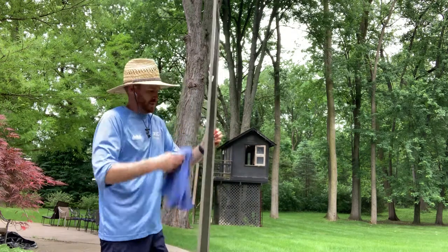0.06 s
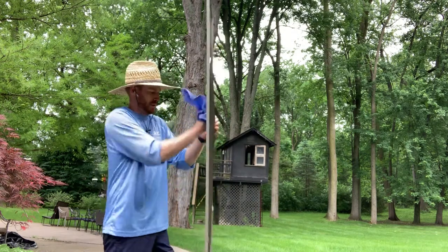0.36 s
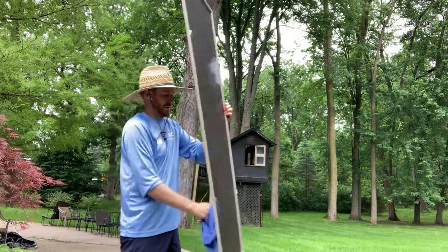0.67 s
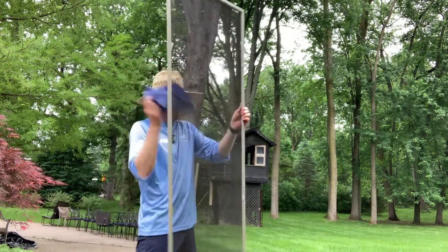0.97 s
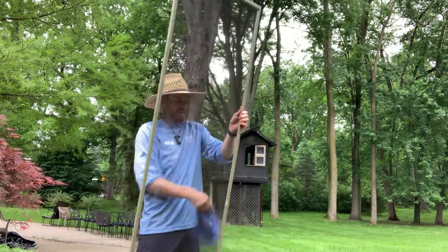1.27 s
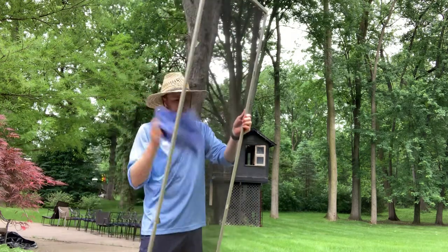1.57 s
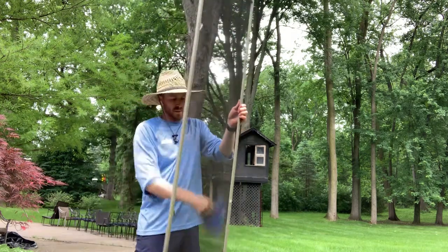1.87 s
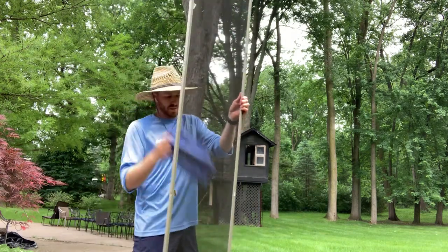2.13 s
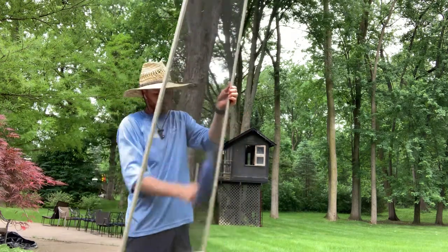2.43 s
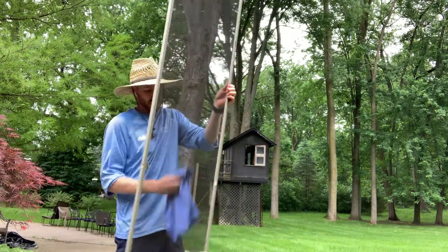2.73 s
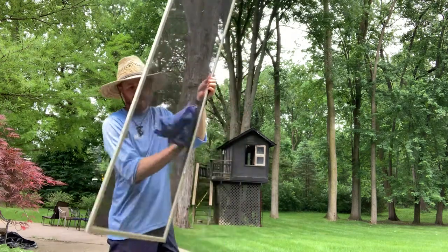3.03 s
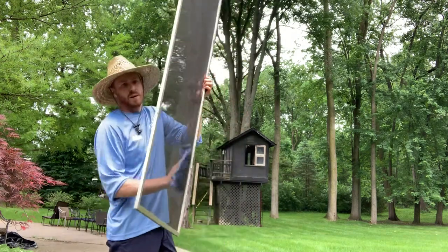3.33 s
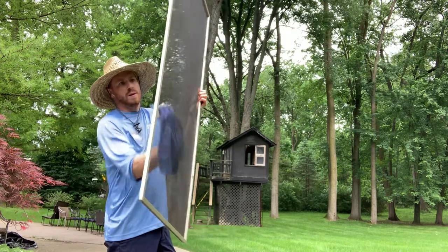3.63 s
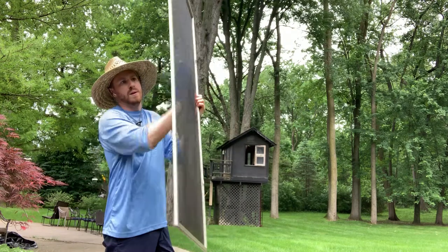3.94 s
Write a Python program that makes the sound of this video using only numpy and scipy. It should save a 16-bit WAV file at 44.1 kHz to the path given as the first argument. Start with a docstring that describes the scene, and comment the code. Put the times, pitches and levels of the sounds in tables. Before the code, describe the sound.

A cloth slaps a window screen three times close by, with soft wipes on the mesh before and after. Behind it in a wooded yard are faint bird whistles, insects and a distant engine hum.

```python
"""Dusting a window screen in a wooded yard

A cloth zips over the mesh, then slaps it three times, ringing the frame; after each slap its
tail flops down dully. Soft wipes follow, fibres rubbing on the threads. Behind, a distant
engine drones and slows, insects sizzle and bird whistles echo among the trees."""
import sys
import numpy as np
from scipy import signal
from scipy.fft import rfft, irfft
from scipy.io import wavfile

SR = 44100
rng = np.random.default_rng(int(sys.argv[2]) if len(sys.argv) > 2 else 0)


def bounce(signal):
    """Save signal as a 16-bit WAV file at the path given by the first command-line argument."""
    frames = np.transpose(np.atleast_2d(signal))
    limited = np.clip(frames, -1, 1)
    pcm = np.round(limited * 32767).astype(np.int16)
    wavfile.write(sys.argv[1], SR, pcm)


N = 176400
TIME = np.arange(N) / SR


def from_db(db):
    """Decibels to gain."""
    return 10 ** (np.asarray(db) / 20)


def unit_rms(x):
    """Scale to rms 1."""
    return x / np.sqrt(np.mean(x ** 2) + 1e-20)


def curves(rows):
    """Interpolate rows of (t/s, values...) to one curve per value column."""
    times, *columns = np.transpose(rows)
    return [np.interp(TIME, times, column) for column in columns]


def colour(x, spectrum):
    """Filter by rows of (f/Hz, level/dB), 24 dB/octave skirts; rms 1."""
    hz, db = np.transpose(spectrum)
    f = np.maximum(np.arange(N // 2 + 1) * SR / N, 1)
    octaves_outside = np.abs(np.log2(f / np.clip(f, hz[0], hz[-1])))
    gain = from_db(np.interp(np.log(f), np.log(hz), db) - 24 * octaves_outside)
    return unit_rms(irfft(rfft(x) * gain, N))


def noise(spectrum):
    """Coloured Gaussian noise; rms 1."""
    return colour(rng.standard_normal(N), spectrum)


def grains(per_s):
    """Tiny random contacts of uneven size; rms 1."""
    return unit_rms((rng.random(N) < per_s / SR) * rng.standard_normal(N))


def drift(corner_hz):
    """Low-passed random wander; rms 1."""
    f = np.arange(N // 2 + 1) * SR / N
    return unit_rms(irfft(rfft(rng.standard_normal(N)) / (1 + (f / corner_hz) ** 2), N))


def burst(start_s, attack_s, hold_s, t60_s):
    """Envelope: linear attack, hold, exponential release."""
    age_s = TIME - start_s
    release_s = np.maximum(age_s - attack_s - hold_s, 0)
    return np.clip(age_s / attack_s, 0, 1) * np.exp(-np.log(1000) * release_s / t60_s)


def ring(force, hz, t60_s):
    """One damped mode; a unit click rings it at height 1."""
    radius = np.exp(-np.log(1000) / (t60_s * SR))
    angle = 2 * np.pi * hz / SR
    return signal.lfilter([0, np.sin(angle)], [1, -2 * radius * np.cos(angle), radius ** 2],
                          force + 1e-18)


def tone(hz):
    """Sine following a pitch curve; rms 1."""
    return np.sqrt(2) * np.sin(2 * np.pi * (np.cumsum(hz) / SR + rng.random()))


def scatter(x, t60_s):
    """Diffuse echoes from trunks and leaves."""
    tail = rng.standard_normal(N) * burst(0.0036, 0.0055, 0, t60_s)
    return signal.fftconvolve(x, tail / np.sqrt(np.sum(tail ** 2)))[:N]


def distant_engine():
    """A far engine hums and slows over a wavering drone and low rumble."""
    firing = [(0, 120.4, -49.5), (.4, 121.8, -47), (1.3, 120.2, -46.5), (2.3, 120.9, -49),
              (2.7, 119.7, -51), (2.95, 112.9, -46.5), (3.25, 109.5, -46.5), (3.55, 103.4, -57),
              (4, 100, -58)]  # firing rate and loudness: t/s, f/Hz, level/dB
    orders = [(.5, 1), (1, 0), (1.5, -19.5), (2, -14)]  # partials: multiple of firing rate, relative level/dB
    drone_swell = [(0, -46), (.3, -40), (.8, -38), (.92, -47), (1.2, -32.5), (1.42, -37.5), (1.58, -30.5),
                   (1.68, -48.5), (1.8, -41.5), (2.2, -37), (2.35, -45), (2.6, -35.5), (2.72, -55),
                   (3.0, -39.5), (3.5, -41), (3.68, -35.5), (4, -47.5)]  # drone envelope: t/s, relative level/dB
    rumble_spectrum = [(20, -18), (40, -5), (56, 0), (80, -7), (110, -8), (160, -16), (260, -21.5),
                       (500, -65)]  # f/Hz, relative level/dB
    firing_hz, db = curves(firing)
    hum = sum(from_db(db + order_db + 1.7 * drift(15)) * tone(k * firing_hz) for k, order_db in orders)
    swell_db, = curves(drone_swell)
    drone_gain = from_db(swell_db - 2.5 + 2.6 * drift(15))
    drone_hz = 67.1 * (1 + 0.048 * drift(10.3))
    return hum + drone_gain * tone(drone_hz) + from_db(-44) * noise(rumble_spectrum)


def chorus(spectrum, flutter_db, flutter_hz):
    """Many tiny rasps merge into a fluttering hiss; rms 1."""
    return unit_rms(noise(spectrum) * from_db(flutter_db * np.tanh(drift(flutter_hz))))


def insects():
    """Katydids, crickets and a higher hiss sizzle together."""
    # chorus spectra: f/Hz, relative level/dB
    katydids = [(5500, -16), (6500, -2.5), (7200, 4), (8000, -1), (9000, -7.5), (11000, -38)]
    crickets = [(6300, -11), (7200, -14), (8050, 11.5), (8450, -8), (9800, -13), (11000, -30)]
    high_hiss = [(11500, -27), (12500, -14), (13300, -1.5), (14500, -1.5), (16000, -7.5)]
    return (from_db(-51) * chorus(katydids, flutter_db=7.5, flutter_hz=150)
            + from_db(-57) * chorus(crickets, flutter_db=6, flutter_hz=27)
            + from_db(-53.5) * chorus(high_hiss, flutter_db=3, flutter_hz=60))


def leaves_and_traffic():
    """Steady hush of leaves and far traffic."""
    hush_spectrum = [(120, -2.5), (250, -3), (380, -2.5), (600, 0), (900, 3), (1250, 1.5), (1700, -3),
                     (2400, -10.5), (3400, -18.5), (4300, -18.5), (5200, -11.5), (6300, -14.5), (9500, -12),
                     (11000, -20.5), (16000, -15)]  # f/Hz, relative level/dB
    return from_db(-47.5) * noise(hush_spectrum)


def wipes():
    """Fibres rub the mesh; on the fastest stroke its evenly spaced threads give a rising zip."""
    strokes = [(0.538, 0.075, -44.5), (0.943, 0.021, -51.5), (1.988, 0.032, -50.5), (2.58, .04, -51),
               (3.172, 0.073, -46.5), (3.657, 0.073, -50), (3.955, 0.17, -47.5)]  # cloth strokes: centre t/s, half length/s, level/dB
    rub_spectrum = [(400, -16), (1000, -2), (2200, 1.5), (3200, -6.5), (4200, -2.5), (6000, 1.5), (8700, 0),
                    (12000, -13.5), (16000, 1)]  # f/Hz, relative level/dB
    zip_glide = [(.495, 1654, -62), (.52, 1715, -48), (.57, 2026, -53), (.588, 2260, -51), (.61, 2400, -74)]  # thread-crossing tone: t/s, f/Hz, level/dB
    zip_partials = [(1, -1), (1.45, -9), (2.001, -7.5), (3, -9)]  # multiple of zip pitch, relative level/dB
    pressure = sum(from_db(db) * np.exp(-((TIME - t) / half_s) ** 2) for t, half_s, db in strokes)
    rub = pressure * colour(grains(per_s=5000), rub_spectrum) * from_db(2 * drift(40))
    glide_hz, zip_db = curves(zip_glide)
    rough_hz = glide_hz * (1 + 0.016 * drift(300))
    zip_tone = sum(from_db(db) * tone(k * rough_hz) for k, db in zip_partials)
    zipping = (TIME > zip_glide[0][0]) & (TIME < zip_glide[-1][0])
    return rub + zipping * from_db(zip_db) * zip_tone


def frame_ticks():
    """The frame ticks lightly as it is turned."""
    ticks = [(0.489, -40), (0.654, -38.5), (1.297, -53), (1.3285, -34), (1.9555, -44), (2.151, -41.5),
             (2.5235, -37.5)]  # t/s, level/dB
    tick_spectrum = [(2500, -18), (4300, -4), (6800, 3), (9000, -18), (15000, -18)]  # f/Hz, relative level/dB
    envelope = sum(from_db(db) * burst(t, 0.00046, 0, t60_s=0.0093) for t, db in ticks)
    return envelope * noise(tick_spectrum)


def birds():
    """Warbling, gliding whistles, smeared by the woods."""
    whistles = [(0.576, 0.14, 2950, 2480, -53), (0.964, 0.036, 4960, 5450, -55),
                (1.075, 0.092, 3440, 3370, -54.5), (1.117, .1, 3150, 2750, -46.5),
                (1.648, 0.066, 2840, 2940, -51), (1.668, 0.037, 3150, 3360, -51),
                (1.727, .13, 2365, 2683, -49), (2.286, 0.12, 5080, 5230, -55.5),
                (2.401, 0.14, 2380, 2565, -48), (2.499, 0.19, 3027, 2308, -51)]  # t/s, length/s, start f/Hz, end f/Hz, relative level/dB
    warble = 1 + 0.017 * drift(112.3)
    song = 0
    for t, length_s, start_hz, end_hz, db in whistles:
        progress = np.clip((TIME - t) / length_s, 0, 1)
        envelope = np.sqrt(np.abs(np.sin(np.pi * progress)))
        glide_hz = start_hz + (end_hz - start_hz) * progress
        song += from_db(db) * envelope * tone(glide_hz * warble)
    return from_db(-6) * song + from_db(-4) * scatter(song, t60_s=1.5)


def slaps():
    """The cloth's edge lands, then its bulk: low smack, spray of fibre contacts, mesh thud, frame ring."""
    # cloth impacts, levels relative: t/s, edge attack/s, edge smack/dB, edge spray/dB,
    # bulk delay/s, bulk smack/dB, bulk spray/dB, mesh thud/dB
    impacts = [(1.2392, .0015, -21.5, -23.5, 0.0097, -23, -20, -29.5),
               (1.8747, 0.00082, -23.5, -24.5, .0128, -25.5, -25.5, -35),
               (2.4524, 0.0026, -31, -26, 0.00596, -25, -23, -29.5)]
    smack_spectrum = [(120, -13), (180, -3.5), (260, -3), (450, -1.5), (650, -1), (850, 2.5), (1120, -2),
                      (1330, -8.5), (1550, -3), (2200, -6.5), (3000, -15), (5000, -7)]  # f/Hz, relative level/dB
    spray_spectrum = [(1500, -14), (3400, -12), (4400, -4), (7400, 0), (9900, -5.5), (12200, -15),
                      (15500, -11)]  # f/Hz, relative level/dB
    frame_modes = [(245, -10, .12), (539, -11, .07), (755, -6, .07), (935, -2, .08), (1175, -6, .07),
                   (1680, -6, .06), (2233, -5, .06), (2498, -8, .1), (4639, -2, .04), (5730, -2, .04),
                   (7400, 3, .045)]  # frame and mesh resonances: f/Hz, relative level/dB, t60/s
    bulk_attack_s, hold_s, smack_t60_s = 0.0013, 0.0038, 0.062
    spray_lag_s, spray_hold_s, spray_t60_s = 0.002, 0.0085, 0.065
    fibres_per_s, mesh_hz = 6400, 281
    push = brush = thud = 0
    for t, attack_s, edge_db, edge_spray_db, delay_s, bulk_db, bulk_spray_db, thud_db in impacts:
        bulk_t = t + delay_s
        push += from_db(edge_db) * burst(t, attack_s, hold_s, smack_t60_s)
        push += from_db(bulk_db) * burst(bulk_t, bulk_attack_s, hold_s, smack_t60_s)
        edge_brush = burst(t, attack_s, spray_hold_s, spray_t60_s)
        bulk_brush = burst(bulk_t + spray_lag_s, bulk_attack_s, spray_hold_s, spray_t60_s)
        brush += np.maximum(from_db(edge_spray_db) * edge_brush, from_db(bulk_spray_db) * bulk_brush)
        mesh = np.sin(2 * np.pi * mesh_hz * (TIME - bulk_t))
        thud += from_db(thud_db) * burst(bulk_t, bulk_attack_s, hold_s, t60_s=0.032) * mesh
    smack = from_db(-5.5) * push * noise(smack_spectrum)
    spray = from_db(-6.5) * brush * colour(grains(fibres_per_s), spray_spectrum)
    force = push * grains(fibres_per_s) / 10
    frame = sum(from_db(db) * ring(force, hz, t60_s) for hz, db, t60_s in frame_modes)
    return smack + spray + thud + from_db(-18.5) * frame


def flops():
    """The cloth's tail falls on the screen: a puff, a hollow knock, a thump of the slack mesh."""
    # tail landings: t/s, puff level/dB, puff hold/s, knock f/Hz, knock level/dB, thump level/dB
    landings = [(1.3286, -30.5, 0.0018, 557, -25, -28.5), (1.954, -34.5, 0.013, 1010, -43, -50),
                (2.56, -40, 0.0033, 1173, -30.5, -50), (2.587, -44, 0.024, 540, -44, -38)]
    puff_spectrum = [(150, -24), (320, -9), (560, 2.5), (800, 1), (1100, -1.5), (1700, -4.5), (3200, -22.5),
                     (5500, -16.5), (8500, -35), (13000, -51)]  # f/Hz, relative level/dB
    thump_hz = 178
    puff = noise(puff_spectrum)
    sound = 0
    for t, puff_db, hold_s, knock_hz, knock_db, thump_db in landings:
        rad_per_hz = 2 * np.pi * (TIME - t)
        sound += from_db(puff_db) * burst(t, 0.0016, hold_s, t60_s=0.094) * puff
        sound += from_db(knock_db) * burst(t, 0.003, 0.00067, t60_s=0.031) * np.sin(knock_hz * rad_per_hz)
        sound += from_db(thump_db) * burst(t, 0.0023, 0.001, t60_s=0.067) * np.sin(thump_hz * rad_per_hz)
    return sound


def scene():
    """The screen close by, the yard all around; mono."""
    screen = slaps() + flops() + frame_ticks() + wipes()
    echoes = from_db(-20) * scatter(screen, t60_s=0.63)
    return (screen + echoes + birds() + distant_engine() + insects() + leaves_and_traffic())[None]


def record(dry):
    """Steep low-pass on the top treble."""
    cutoff_hz = 15800
    return signal.sosfilt(signal.ellip(12, 0.1, 80, cutoff_hz, fs=SR, output="sos"), dry)


dry = scene()
out = record(dry)
bounce(out)
```